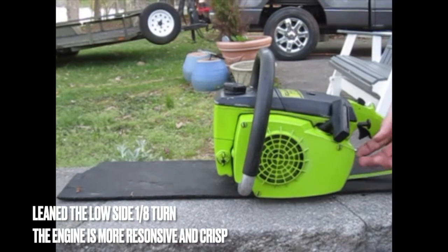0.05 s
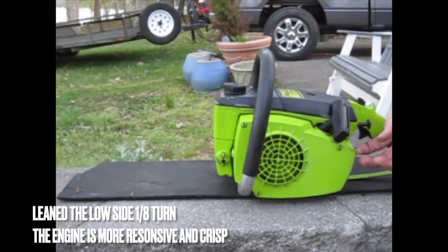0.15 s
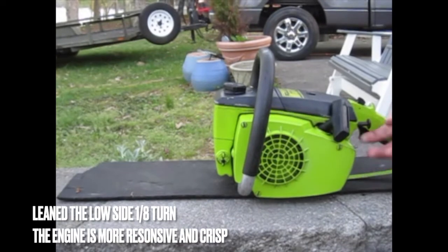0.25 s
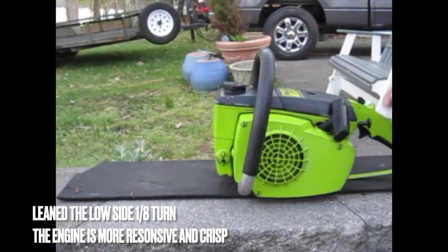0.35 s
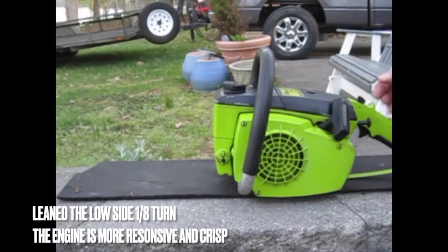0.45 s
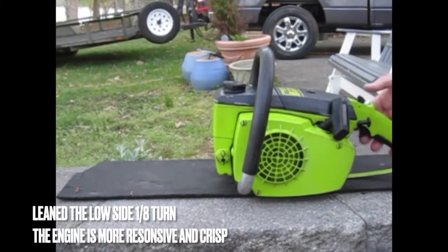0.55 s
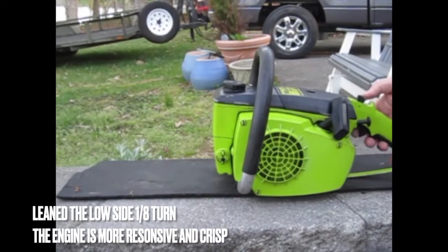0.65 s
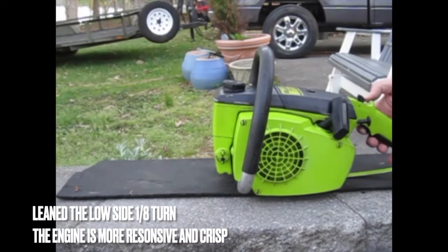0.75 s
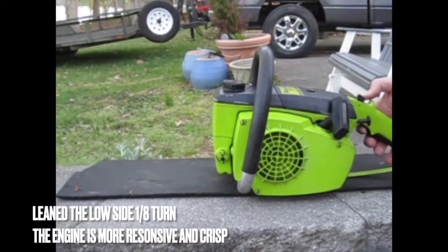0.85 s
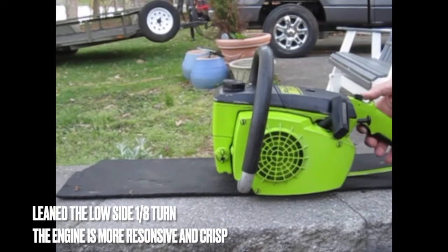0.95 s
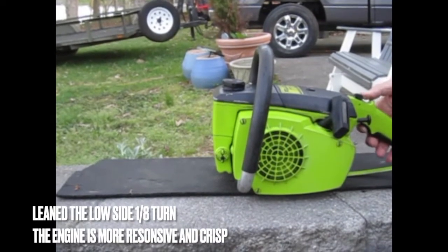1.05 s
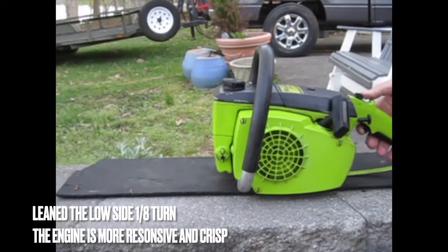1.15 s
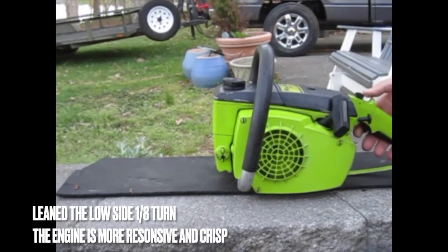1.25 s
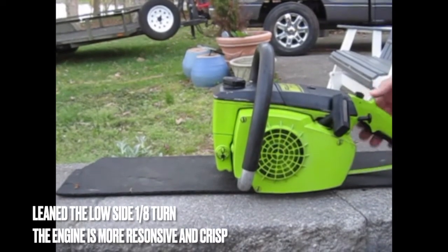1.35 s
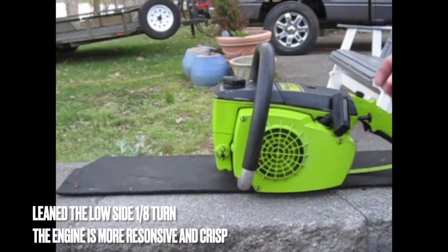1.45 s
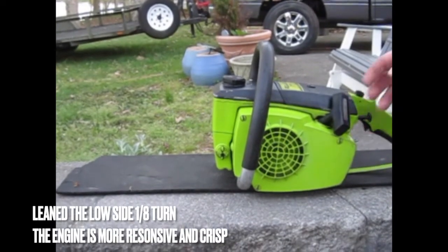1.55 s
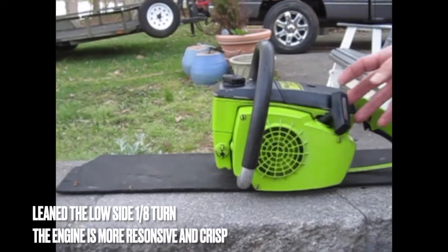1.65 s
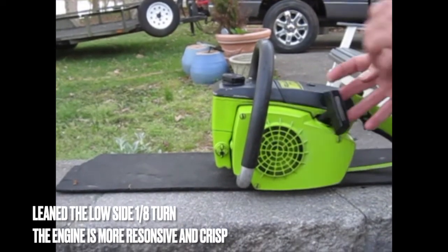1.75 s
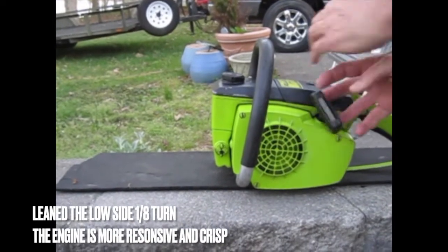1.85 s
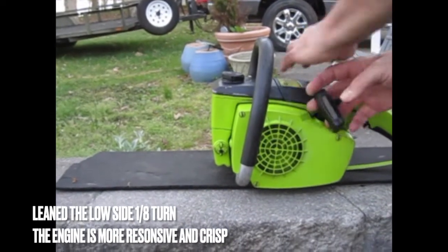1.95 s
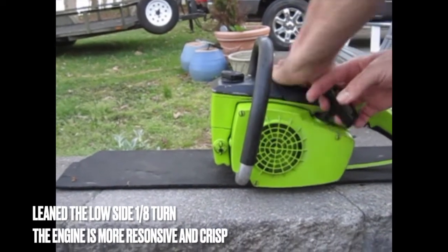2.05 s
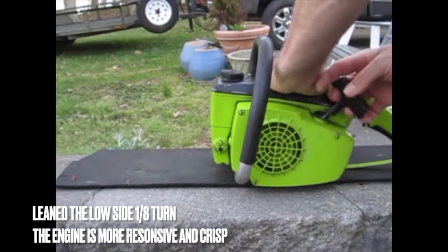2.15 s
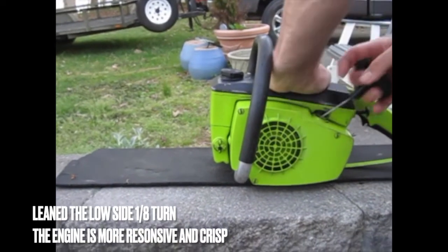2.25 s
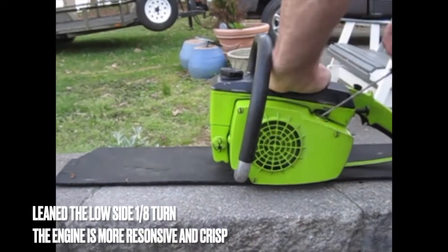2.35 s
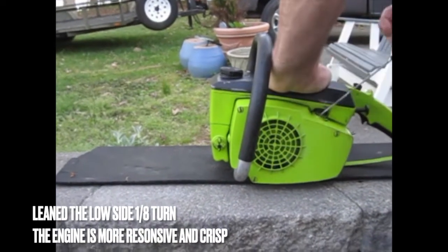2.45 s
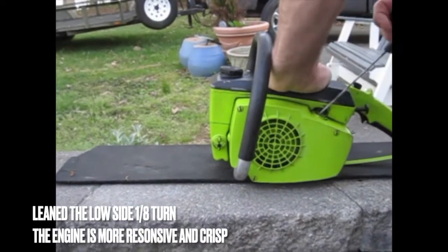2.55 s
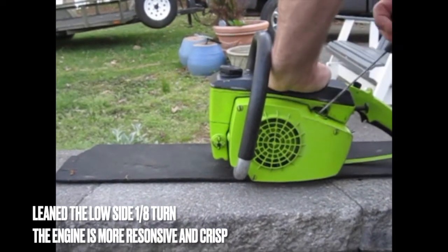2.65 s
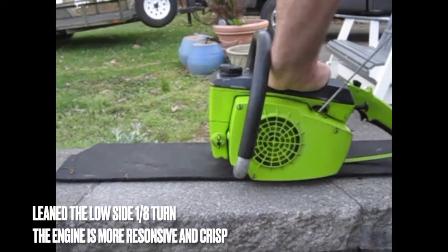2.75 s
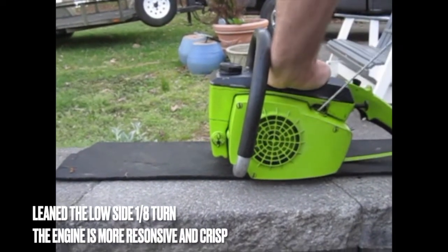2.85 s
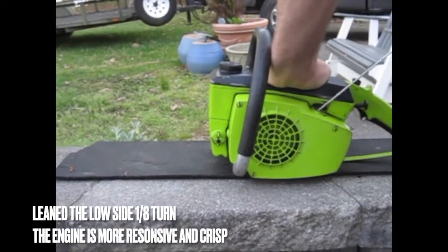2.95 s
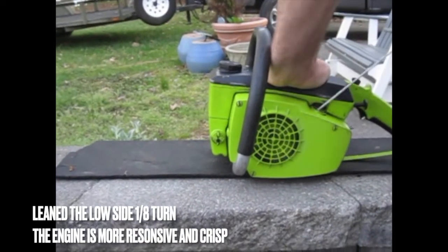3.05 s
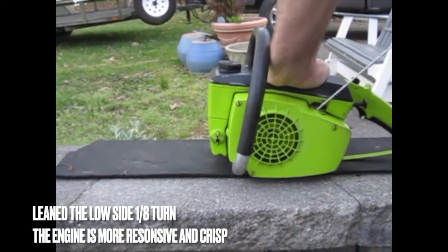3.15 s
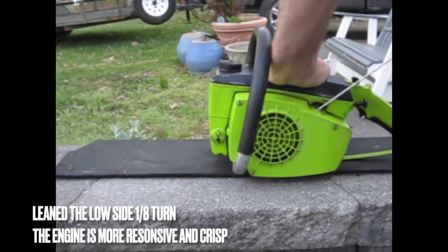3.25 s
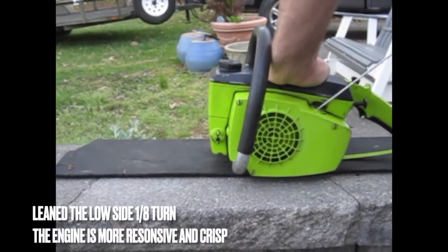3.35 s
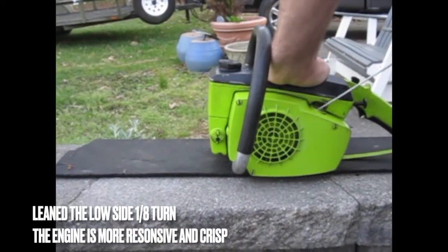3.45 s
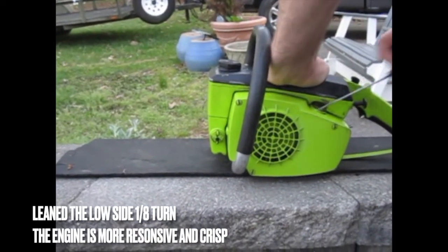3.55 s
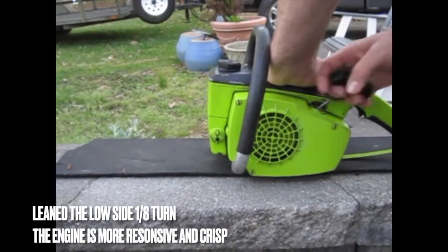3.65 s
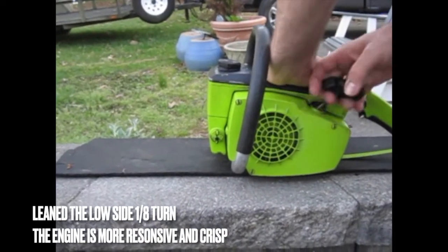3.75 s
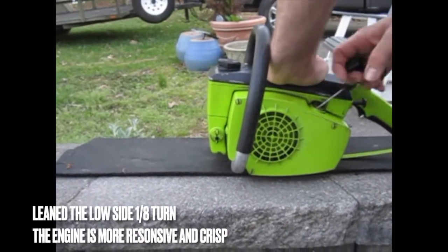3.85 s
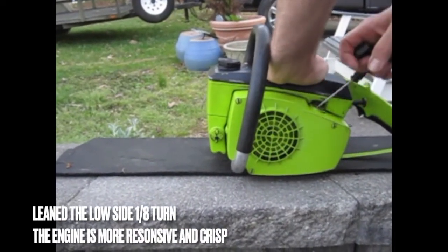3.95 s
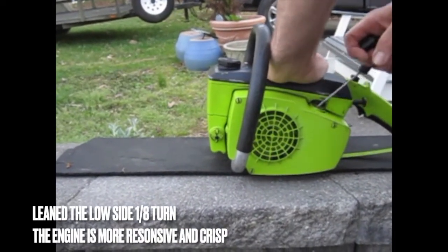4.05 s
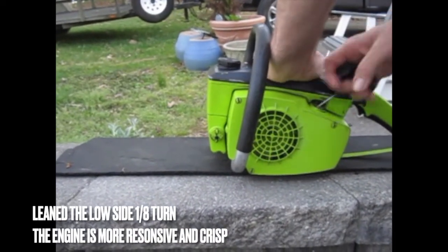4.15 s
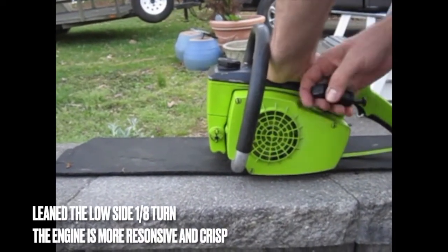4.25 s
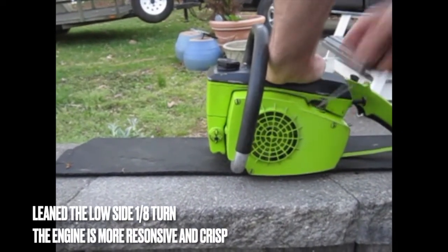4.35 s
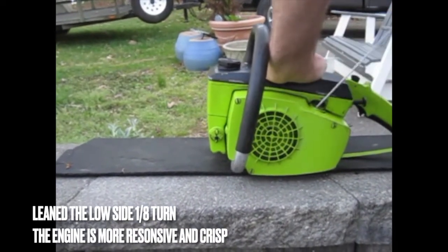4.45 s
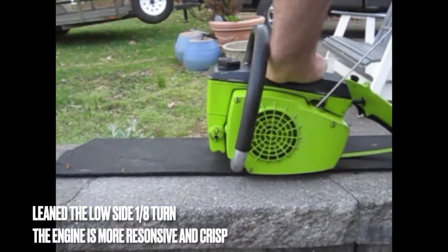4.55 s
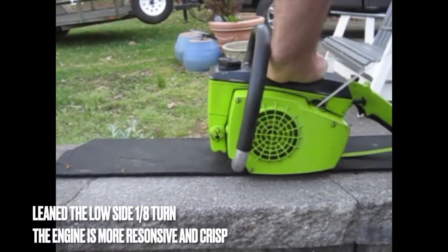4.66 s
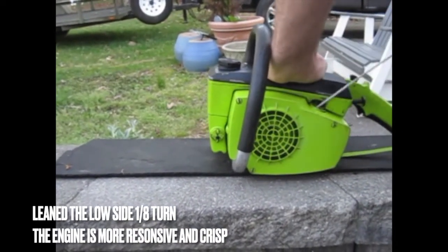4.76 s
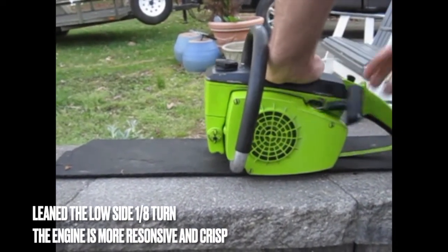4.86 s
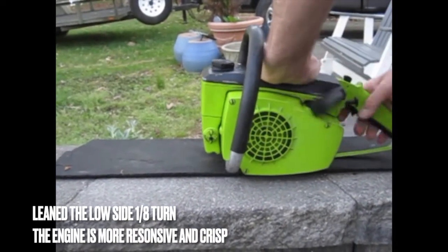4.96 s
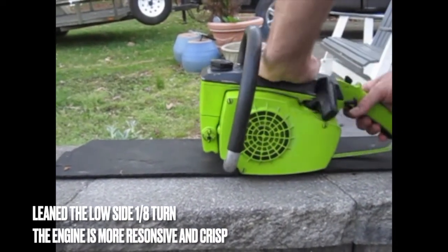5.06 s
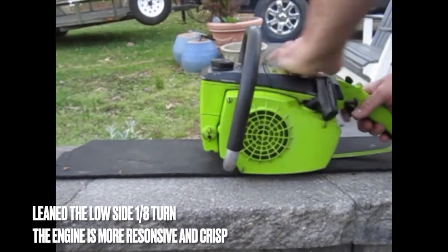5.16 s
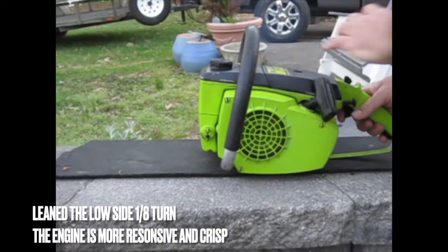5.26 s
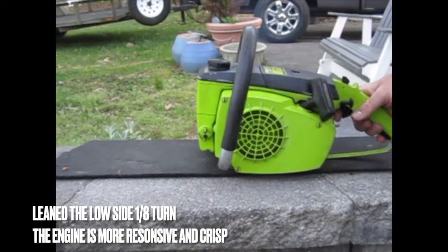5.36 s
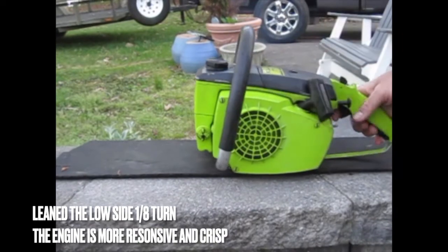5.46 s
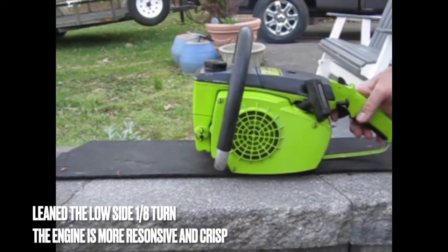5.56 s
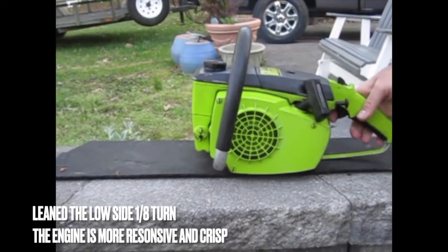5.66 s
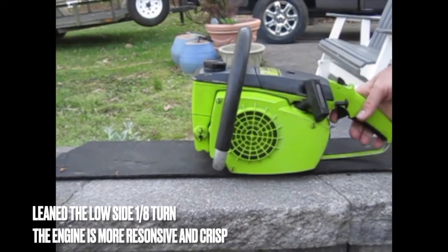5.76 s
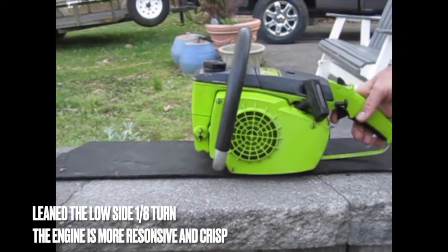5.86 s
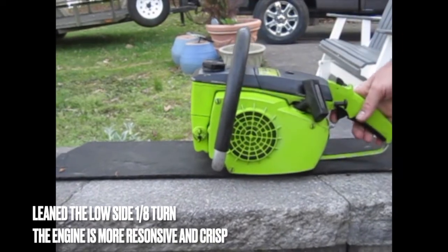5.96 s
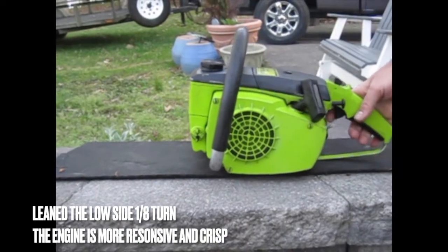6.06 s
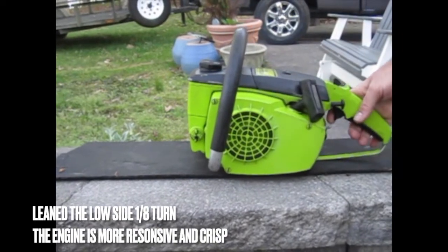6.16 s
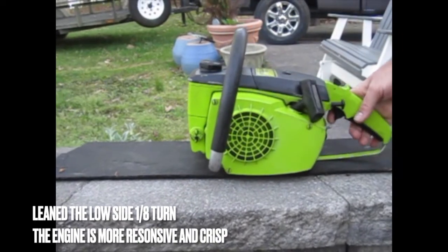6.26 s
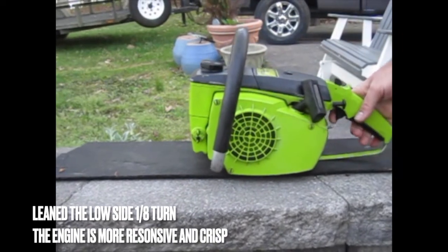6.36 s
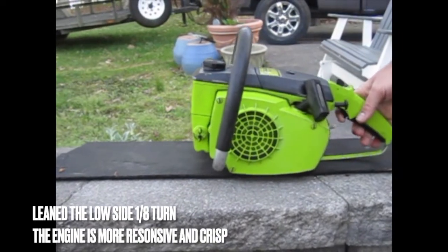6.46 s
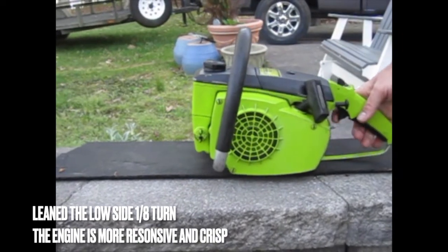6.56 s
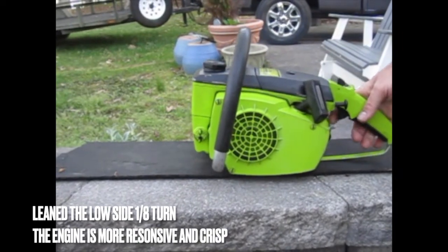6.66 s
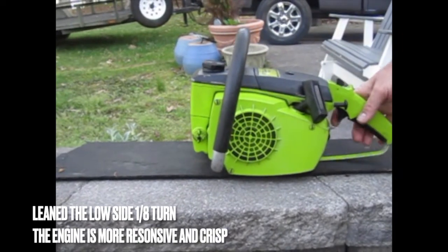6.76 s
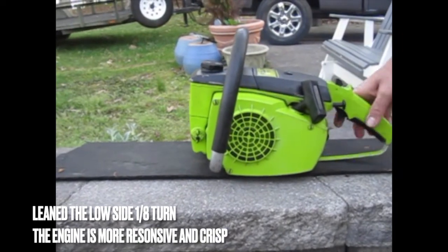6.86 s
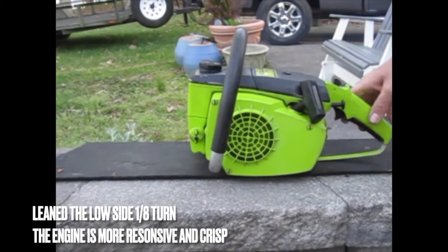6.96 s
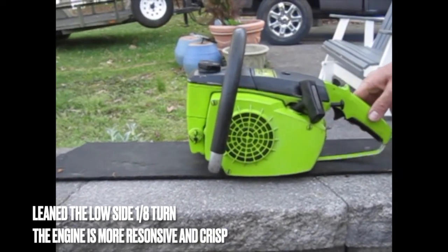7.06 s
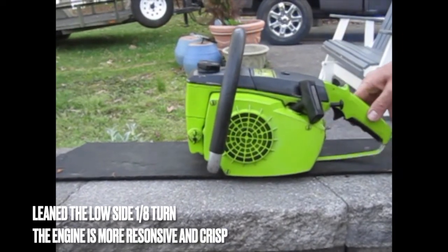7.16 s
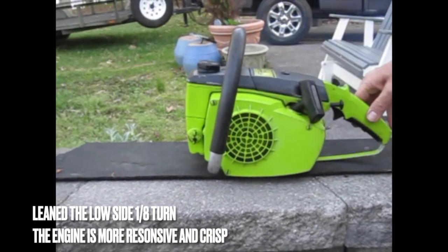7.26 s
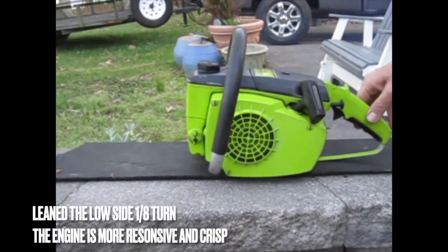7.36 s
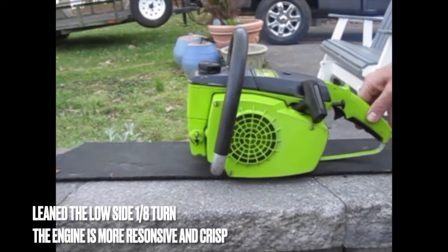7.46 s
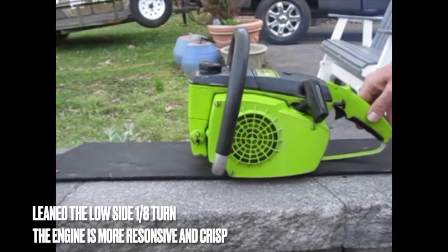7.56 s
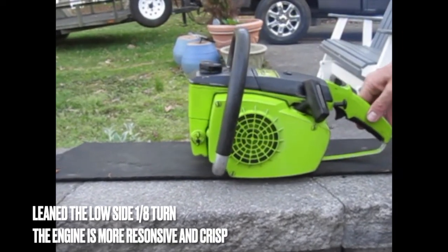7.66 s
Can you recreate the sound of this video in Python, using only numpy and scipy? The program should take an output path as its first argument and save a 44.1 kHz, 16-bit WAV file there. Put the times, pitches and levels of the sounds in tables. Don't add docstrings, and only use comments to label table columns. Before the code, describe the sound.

Close to a small two-stroke chainsaw on a stone ledge in a quiet yard. Switches and levers click, a palm thumps the plastic shell, then several cord pulls bring hard clacks, whirring flywheel and coughs. At 4.5 seconds the engine catches and climbs to a raspy high rev, coasts down, gets a brief second rev at 6.5 seconds, then slows with popping exhaust.

```python
import sys
import numpy as np
from scipy import signal
from scipy.fft import rfft, irfft, next_fast_len
from scipy.io import wavfile
from scipy.ndimage import uniform_filter1d

SR = 44100
rng = np.random.default_rng(int(sys.argv[2]) if len(sys.argv) > 2 else 0)


def makeup_ratio(level_db):
    decades = np.asarray(level_db, float) / 20
    return 10 ** decades


def store_pcm(level_fs):
    pcm = np.round(np.clip(level_fs, -1, 1) * 32767).astype(np.int16)
    wavfile.write(sys.argv[1], SR, np.atleast_2d(pcm).T)


N = 340011
TIME_S = np.arange(N) / SR

# freq_hz, density_db
HUM_SPECTRUM = [(88, -47), (150, -37.5), (172, -11), (821, -2.5), (1080, -3.5), (1170, 0), (1830, -11),
                (2020, -17), (2180, -10), (2310, -8.5), (16000, -34.5)]
# freq_hz, width_hz, level_db
HUM_PEAKS = [
    (1170, 160, -9.5),
    (1873, 41, -3.5),
    (2120, 77, -10.5),
]
HUM_DB = -49.5
# time_s, level_db
WIND = [(0, -57), (1.14, -57.5), (1.22, -47.5), (1.55, -57.5), (1.75, -50.5), (2.0, -49), (2.15, -56),
        (3.35, -56), (3.5, -66), (3.8, -58), (4.4, -55), (4.5, -73)]
# time_s, peak_db, pitch_hz
LOW_THUMPS = [(1.22, -32.5, 200), (1.351, -38.5, 76.6), (1.758, -45, 130), (1.853, -42, 120),
              (1.955, -31, 153), (2.806, -33.5, 136), (3.108, -27.5, 130), (3.361, -42, 161),
              (3.84, -41, 80), (4.389, -40, 100), (7.653, -30, 140)]
# start_s, length_s, from_hz, to_hz, level_db
CHIRPS = [
    (1.448, .016, 5700, 7500, -57),
    (.562, .04, 8000, 6000, -68),
]

# start_s, end_s, first_db, last_db
RUBS = [(2.23, 2.448, -43.5, -50.5), (2.84, 2.915, -37, -45), (3.135, 3.215, -40, -52),
        (2.7, 2.95, -52, -53), (2.98, 3.197, -48, -37), (3.306, 3.42, -46, -38), (3.622, 3.838, -48, -45),
        (4.084, 4.383, -45, -51), (4.393, 4.534, -39, -35.5)]
# freq_hz, density_db
RUB_SPECTRUM = [(500, -8), (1100, 9), (3000, -3.5), (6500, -10.5), (12000, -22), (16000, -42)]
# hardest_s, whirr_db
PULLS = [
    (2.35, -47.5),
    (2.8, -38),
    (3.18, -45),
    (4.42, -36.5),
]
PULL_RISE_S, PULL_FALL_DB_PER_S = 0.098, 68
# freq_hz, density_db
WHIRR_SPECTRUM = [(150, -35), (200, -9), (800, 0), (1200, 0), (2300, -9), (16000, -35)]
# start_s, end_s, level_db, fall_db_per_s
SPRING = [(2.07, 2.174, -43, 25), (3.401, 3.573, -40.5, 24), (3.575, 3.83, -41, 50), (3.84, 3.94, -56, 28)]
SPRING_HZ = 6627

# time_s, peak_db, knock_hz, rattle_t60_s, treble_db
THUDS = [(0.339, -26.5, 940, .05, -5), (1.703, -9.5, 945, 0.035, -17), (2.246, -24, 1070, .05, -6),
         (2.295, -7, 797, 0.046, 1.8), (2.321, -12.5, 520, 0.068, -15), (2.365, -22, 1300, .04, -10),
         (2.37, -20, 880, .05, -10), (2.386, -25, 1410, .03, -8), (2.502, -18.5, 930, 0.013, 2),
         (2.503, -16, 3700, 0.0088, -6), (2.764, -17.5, 597, 0.037, -12), (2.774, 6, 1560, 0.023, -6),
         (2.836, -12, 2000, 0.04, -3), (2.837, -13, 640, 0.067, -1), (2.884, -14, 1350, .065, -10),
         (3.008, -20, 700, .04, -10), (3.018, 3.5, 1450, 0.03, -3), (3.136, -5.5, 2050, 0.031, 1.5),
         (3.137, -10, 723, .06, -5), (3.156, -13, 1300, 0.07, -8), (3.198, -17, 1200, .036, -6),
         (3.84, -9.5, 865, 0.043, -10), (3.991, -26, 1500, .02, -10), (4.002, -12, 1053, 0.04, -4),
         (4.004, -12, 1490, .04, -5.5), (4.009, -9, 1100, .05, -6), (4.012, -26, 2550, .12, -20),
         (4.13, -30, 3200, .1, -8), (4.162, -29, 3200, .05, -8), (4.372, -26, 3150, .1, -15),
         (4.42, -30, 3150, .08, -15), (4.455, -19, 1300, 0.04, -1), (4.461, -7, 1190, 0.022, -6)]
THUD_CRACK_DB = -33
# time_s, peak_db, knock_hz, crack_re_peak_db
SNAPS = [(0.101, -27, 1310, -16), (0.166, -13, 2620, 2), (0.19, -35, 1150, 1), (0.31, -17.5, 1320, -16),
         (0.942, -33.5, 1110, -10), (2.077, -6.5, 940, -10), (2.188, -15.5, 1340, -5),
         (3.331, -14, 1430, -3), (3.355, -14, 1074, -11), (3.689, -20, 1055, 0), (3.734, -26.5, 1430, -11),
         (3.839, -2.5, 1450, -7), (4.119, -24, 1400, -8), (4.124, -22, 900, -20), (4.164, -35, 931, 1.5),
         (4.254, -28, 1400, -14), (4.263, -28, 1090, -20), (4.358, -23, 1280, -17),
         (4.387, -1.5, 1350, -0.5), (4.476, -20, 1210, 2.5)]
SNAP_T60_S, SNAP_T60_S_PER_DB, SNAP_RING_DB, SNAP_RING_PER_DB = .035, -.001, -46, 0.1
# time_s, peak_db
RATCHET = [(3.405, -18), (3.459, -19.5), (3.513, -19), (3.576, -17), (3.675, -18)]
TOOTH_HZ, TOOTH_T60_S, TOOTH_CRACK_DB, TOOTH_RING_DB = 1166, 0.069, 9.5, -36.5
# time_s, peak_db
SLACK = [(2.059, -22.5), (2.288, -27), (4.377, -24), (2.762, -19), (3.006, -23), (3.324, -20.5),
         (3.395, -31), (3.664, -21), (3.826, -20)]
SLACK_HZ, SLACK_T60_S, SLACK_CRACK_DB = 1300, 0.097, -13.5
# freq_hz, level_db, t60_s
SHELL_MODES = [(963, -24, 0.12), (1007, 2.5, 0.051), (1430, 2, 0.037), (1500, -28, 0.11), (2090, 1, 0.022),
               (2548, -5.5, 0.07), (3330, -38, 0.09), (3900, -47, .03)]
# freq_hz, level_db, t60_s
PAWL_MODES = [(5593, -9, 0.12), (6185, 0, 0.14), (8716, -10, 0.07), (6912, -14, 0.093), (7682, -8, 0.15),
              (9211, -14, 0.16), (10190, -13, 0.08), (11540, -15, 0.094), (12600, -10, 0.055),
              (13550, -14, 0.081), (13890, -8, 0.12), (14120, -5, 0.061), (14320, -12, 0.078)]
# freq_hz, width_hz, level_db
CRACK_PEAKS = [(6260, 290, -3.5), (7500, 540, -3), (8680, 145, -3.5), (10300, 140, -3), (11300, 690, -13.5),
               (12670, 250, -5.5), (14200, 270, -15)]

# time_s, turns_per_s
CRANK_SPEED = [(4.54, 61), (4.62, 69), (4.66, 79.19), (4.8, 105.03), (4.95, 120.81), (5.2, 139.97),
               (5.4, 115.89), (5.65, 91.97), (5.9, 78.61), (6.1, 67.47), (6.3, 56.88), (6.45, 53.29),
               (6.595, 105.24), (6.8, 88.65), (7.1, 71.29), (7.4, 57.28), (7.75, 44.21)]
FIRST_TURN_S, CRUISE_HZ = 4.5518, 100
# start_s, end_s, fires_every_turns, first_bang_db, last_bang_db
THROTTLE = [
    (4.54, 4.645, 1, -8, -11),
    (4.65, 5.04, 2, -6.5, -13),
    (5.048, 5.199, 2, -10.5, -12),
    (6.46, 6.599, 1, -7, -10.5),
]

# freq_hz, density_db
AIR_SPECTRUM = [(1710, -15), (2900, 6), (3520, -4), (3860, -6.5), (4610, -11), (6640, -7), (7770, -9.5),
                (9980, -13), (15400, -26), (16300, -60)]
# freq_hz, width_hz, level_db
CASING_PEAKS = [(5130, 110, 7), (5900, 19, 17), (6650, 540, 8.5), (8700, 130, 7), (10300, 120, 4),
                (11500, 300, 2.5), (12600, 150, -2), (14050, 230, -4), (15580, 60, -3)]
HISS_DB, HISS_DB_PER_OCTAVE, HISS_OPEN_DB = -33.5, 9.5, -3
GULP_S, GULP_WIDTH_S, GULP_DB = 6.5, 0.04, 6
THROB_DB, THROB_OPEN_DB = -60.5, -48

# freq_hz, width_hz, level_db
INTAKE_PEAKS = [(2150, 200, 0), (2640, 160, 1.5), (3220, 150, -9), (4100, 250, -15)]
INTAKE_DB, INTAKE_DB_PER_OCTAVE, INTAKE_OPEN_DB = -34, 3.5, -3.5
TUNED_HZ, TUNED_OCTAVES, TUNED_SHUT_DB, TUNED_OPEN_DB = 94, 0.22, 9, 8.5
SECOND_HZ, SECOND_OCTAVES, SECOND_DB = 66, .08, 3.5

# time_s, peak_db
BACKFIRES = [(5.2048, -22), (6.4287, -17.5), (6.4655, -12.5), (7.2865, -14), (7.571, -15.5), (7.652, -8.5)]
# time_s, peak_db
CLOSED_BANGS = [(5.853, -10), (5.866, -8), (5.981, -12), (6.357, -12), (6.923, -11), (6.974, -10),
                (7.554, -11), (6.023, -8), (6.08, -7), (6.125, -7), (6.187, -7), (6.235, -7), (6.285, -7),
                (6.303, -6), (6.321, -5), (6.376, -5), (6.394, -6), (6.432, -6), (7.08, -6), (7.136, -7),
                (7.195, -8), (7.211, -8), (7.288, -5), (7.387, -6), (7.422, -6), (7.458, -6), (7.495, -8),
                (7.514, -6), (7.572, -5), (7.654, -5)]
# time_s, peak_db
COUGHS = [(2.336, -6), (2.807, 4.5), (2.858, -6.5), (2.885, -5.5), (3.108, 7.5), (3.154, -5), (3.18, -3),
          (4.419, -1), (4.438, -8), (4.4605, 6.5), (4.4635, 4), (4.491, 6), (4.514, 8), (4.533, 6.5)]
# freq_hz, level_db, t60_s
BANG_MODES = [(308, -20.5, 0.025), (552.6, -7, 0.022), (664, -10, 0.026), (860, -7.5, 0.016),
              (1328, -14.5, 0.021), (1560, -19.5, 0.035)]
# freq_hz, level_db, t60_s
BLAST_MODES = [(1480, -14.5, 0.011), (2060, -15.5, 0.0075), (3060, -15, .008)]
BLAST_EARLY_S = 0.001097
# freq_hz, level_db, t60_s
PUFF_MODES = [(317, -15, 0.027), (600, -13.5, 0.022), (704, -7, 0.024), (907, -7.5, 0.01),
              (1210, -7, 0.017), (1490, 0.5, 0.012)]
# freq_hz, level_db, t60_s
SUCK_MODES = [(315, -9, 0.024), (566, -2.1, 0.014), (682, -4.5, 0.031), (815, -21, 0.022),
              (1075, -10.5, 0.065)]
# freq_hz, width_hz, level_db
EDDY_PEAKS = [(1100, 270, 1.5), (1450, 290, 4.5), (2160, 260, -5)]
PORT_OPEN_TURNS = .352
UNFIRED_LATE_S = .00066
PUFF_DB, PUFF_DB_PER_OCTAVE, PUFF_OPEN_DB = -13, -1.2, 0.3
EDGE_DB_PER_OCTAVE, LOW_DB_PER_OCTAVE = 3.5, 8.0
SHUT_SHARE, SHUT_OPEN_SHARE, SHUT_FIRED_SHARE, HALF_FIRED_SUCK = 0.42, 0.17, 0.44, 0.58
SHUT_DB_PER_OCTAVE, SHUT_EARLY_S = -11.0, 0.00069
SPUTTER_BELOW_HZ, SPUTTER_SHARE, SPUTTER_DB, BANG_SPREAD_DB = 60, .04, -14.0, .7
WEAK_DB, WEAK_FROM_S, WEAK_OVER_S, WEAK_LATE_S = -20, 0.011, 0.0027, 0.00093
LEDGE_DIP_HZ = 1780


def rms_one(x):
    return x / np.sqrt(np.mean(x ** 2) + 1e-20)


def in_time(rows):
    s, *columns = np.transpose(rows)
    return [np.interp(TIME_S, s, c) for c in columns]


def bump(x, centre, width):
    return np.exp(-.5 * ((x - centre) / width) ** 2)


def clicks(s, size):
    out = np.full(N, 1e-18)
    at = np.clip(np.round(np.asarray(s) * SR).astype(int), 0, N - 1)
    np.add.at(out, at, size)
    return out


def decaying(x, t60_s):
    return signal.lfilter([1], [1, -makeup_ratio(-60 / (t60_s * SR))], x)


def cut(x, hz, kind, order=2):
    return signal.sosfilt(signal.butter(order, hz, kind, fs=SR, output="sos"), x)


def ring(x, modes):
    out = 0
    for hz, db, t60_s in modes:
        r = makeup_ratio(-60 / (t60_s * SR))
        w = 2 * np.pi * hz / SR
        out = out + signal.lfilter([0, makeup_ratio(db) * np.sin(w)], [1, -2 * r * np.cos(w), r * r], x)
    return out


def resonate(x, peaks):
    out = 0
    for k, (hz, width_hz, db) in enumerate(peaks):
        r = np.exp(-np.pi * width_hz / SR)
        top = (-1) ** k * makeup_ratio(db) * (1 - r * r) / 2
        out = out + signal.lfilter([top, 0, -top], [1, -2 * r * np.cos(2 * np.pi * hz / SR), r * r], x)
    return out


def coloured(spectrum):
    hz, db = np.transpose(spectrum)
    size = next_fast_len(N)
    log_hz = np.log(np.arange(size // 2 + 1) * SR / size + 1)
    shape = makeup_ratio(np.interp(log_hz, np.log(hz), db))
    return rms_one(irfft(rfft(rng.standard_normal(size)) * shape, size)[:N])


def yard():
    wind_db, = in_time(WIND)
    hum = coloured(HUM_SPECTRUM) + makeup_ratio(22) * resonate(rng.standard_normal(N), HUM_PEAKS)
    lumps = makeup_ratio(5.1 * rms_one(cut(rng.standard_normal(N), 14, "low")))
    wind = rms_one(lumps * cut(rng.standard_normal(N), [45, 200], "band"))
    thumps = 0
    for s, db, hz in LOW_THUMPS:
        thumps = thumps + ring(cut(clicks([s], makeup_ratio(db)), 380, "low"), [(hz, 0, .12), (1.7 * hz, -5, .05)])
    return makeup_ratio(HUM_DB) * hum + makeup_ratio(wind_db) * wind + thumps


def bird():
    out = np.zeros(N)
    for s, length_s, from_hz, to_hz, db in CHIRPS:
        u = np.arange(round(length_s * SR)) / (length_s * SR)
        hz = to_hz + (from_hz - to_hz) * (1 - u) ** 2
        tone = makeup_ratio(db) * np.sin(np.pi * u) * np.sin(2 * np.pi * np.cumsum(hz) / SR)
        tail = makeup_ratio(-29 - 150 * np.arange(4000) / SR) * rng.standard_normal(4000)
        at = round(s * SR)
        out[at:at + len(u)] += tone
        out[at + 200:at + 4199 + len(u)] += np.convolve(tone, tail)
    return out


def rubbing():
    level = 0
    for start, end, first_db, last_db in RUBS:
        inside = (TIME_S > start) & (TIME_S < end)
        level = level + makeup_ratio(np.interp(TIME_S, [start, end], [first_db, last_db])) * inside
    grain = makeup_ratio(3.0 * rms_one(cut(rng.standard_normal(N), 120, "low")))
    return uniform_filter1d(level, size=900) * rms_one(grain * coloured(RUB_SPECTRUM))


def flywheel():
    level = 0
    for s, db in PULLS:
        fall_db = PULL_FALL_DB_PER_S * np.maximum(TIME_S - s, 0)
        level = level + makeup_ratio(db - fall_db) * np.clip(1 + (TIME_S - s) / PULL_RISE_S, 0, 1)
    return level * coloured(WHIRR_SPECTRUM)


def spring():
    level = 0
    for start, end, db, fall in SPRING:
        level = level + makeup_ratio(db - fall * (TIME_S - start)) * (TIME_S > start) * (TIME_S < end)
    return uniform_filter1d(level, size=90) * np.sin(2 * np.pi * SPRING_HZ * TIME_S)


def contacts():
    rows = [(s, db, hz, THUD_CRACK_DB, t60_s, TOOTH_RING_DB, treble_db)
            for s, db, hz, t60_s, treble_db in THUDS]
    for s, db, hz, crack_db in SNAPS:
        t60_s = SNAP_T60_S + SNAP_T60_S_PER_DB * db
        rows.append((s, db, hz, crack_db, t60_s, SNAP_RING_DB + SNAP_RING_PER_DB * db, 0))
    rows += [(s, db, TOOTH_HZ, TOOTH_CRACK_DB, TOOTH_T60_S, TOOTH_RING_DB, 0) for s, db in RATCHET]
    rows += [(s, db, SLACK_HZ, SLACK_CRACK_DB, SLACK_T60_S, TOOTH_RING_DB, 0) for s, db in SLACK]
    return rows


def knocks():
    out, t = np.zeros(N), np.arange(8800) / SR
    click = t == 0
    for s, db, hz, crack_db, t60_s, ring_db, treble_db in contacts():
        noise = rng.standard_normal((2, len(t)))
        t60_s = np.clip(t60_s, .005, .3)
        rattle = makeup_ratio(db - 60 * t / t60_s) * noise[0] * np.minimum(t / 0.0011, 1)
        snap_level = makeup_ratio(-60 * t / (0.29 * t60_s)) + 0.21 * makeup_ratio(-60 * t / t60_s)
        snap = makeup_ratio(db + crack_db) * noise[1] * snap_level
        body = makeup_ratio(2.0) * resonate(rattle, [(hz, 250, 0), (1.85 * hz, 1500, -5)])
        body = body + makeup_ratio(-41) * ring(rattle, SHELL_MODES)
        body = body + ring(makeup_ratio(db - 10.0) * cut(click, 3.0 * hz, "low"), [(hz, 0, 1.05 * t60_s)])
        dull = resonate(body, [(hz, 0.64 * hz, 0)])
        body = dull + makeup_ratio(treble_db) * (body - dull)
        crack = makeup_ratio(5.0) * (resonate(snap, CRACK_PEAKS) + 0.3 * cut(snap, [2500, 14000], "band"))
        uneven = [(f, level + 4.0 * luck, min(decay, .2))
                  for (f, level, decay), luck in zip(PAWL_MODES, noise[0, -20:])]
        steel = ring(makeup_ratio(db + crack_db + ring_db + 17) * click, uneven)
        at = round(s * SR)
        out[at:at + len(t)] += cut(body, [200, 4200], "band") + crack + steel
    return out


def crank():
    speed, = in_time(CRANK_SPEED)
    angle = np.cumsum(speed) / SR
    angle -= np.interp(FIRST_TURN_S, TIME_S, angle)
    times = np.interp(np.arange(int(angle[-1]) + 1), angle, TIME_S)
    first_rev = TIME_S < THROTTLE[2][1]
    second_rev = (TIME_S > THROTTLE[3][0]) & (TIME_S < THROTTLE[3][1])
    opened = uniform_filter1d(1. * (first_rev | second_rev), size=1500)
    return times, angle, np.log2(speed / CRUISE_HZ), opened


def fan(angle, octaves, opened):
    hiss_db = HISS_DB + HISS_DB_PER_OCTAVE * octaves + HISS_OPEN_DB * opened
    hiss_db = hiss_db + GULP_DB * bump(TIME_S, GULP_S, GULP_WIDTH_S)
    air = coloured(AIR_SPECTRUM)
    rattle = rms_one(resonate(rng.standard_normal(N), CASING_PEAKS))
    touches = np.interp(angle % 1, np.linspace(0, 1, num=160), rng.standard_normal(160))
    rattle = rattle + makeup_ratio(-1.5) * rms_one(cut(touches, [3000, 4600], "band"))
    pulse = 1 + 0.3 * np.cos(2 * np.pi * (angle - .1))
    fade_in = np.clip((TIME_S - 4.44) / 0.079, 0, 1)
    return makeup_ratio(hiss_db) * pulse * fade_in * (air + makeup_ratio(-10.0) * rattle)


def throb(times, angle, opened):
    running = np.clip((TIME_S - times[0]) / .05, 0, 1)
    return makeup_ratio(THROB_DB + (THROB_OPEN_DB - THROB_DB) * opened) * running * np.sin(2 * np.pi * angle)


def intake(times, angle, octaves, opened):
    tuned_db = TUNED_SHUT_DB + (TUNED_OPEN_DB - TUNED_SHUT_DB) * opened
    ring_db = INTAKE_DB + INTAKE_OPEN_DB * opened + INTAKE_DB_PER_OCTAVE * octaves
    ring_db = ring_db + tuned_db * bump(octaves, np.log2(TUNED_HZ / CRUISE_HZ), TUNED_OCTAVES)
    second = bump(octaves, np.log2(SECOND_HZ / CRUISE_HZ), SECOND_OCTAVES)
    ring_db = ring_db + SECOND_DB * (1 - opened) * second
    depth = np.clip(.09 * (np.gradient(angle) * SR - 60) / 5, .15, .8)
    gust = np.exp(depth * (np.cos(2 * np.pi * (angle - .68)) - 1)) * rng.standard_normal(N)
    period = np.gradient(times)
    gulp_s = times + .5 * period
    size = 32.0 / (period[:, None] * CRUISE_HZ) ** 2 * makeup_ratio(1.2 * rng.standard_normal((len(times), 2)))
    snap = sum(clicks(gulp_s + .0019 * k, size[:, k] * .7 ** k) for k in range(2))
    box = resonate(resonate(snap + gust, INTAKE_PEAKS), [(2160, 4800, 0)])
    running = np.clip((TIME_S - times[0] + 0.035) / 0.1, 0, 1)
    level = np.sqrt(uniform_filter1d(box ** 2, size=6001) + 1e-12)
    return makeup_ratio(ring_db) * box / level * running


def backfires():
    s, db = np.transpose(BACKFIRES)
    hit = clicks(s, makeup_ratio(db + 12))
    burst = 3.9 * hit + 0.43 * decaying(hit, 0.0063) * rng.standard_normal(N)
    return resonate(burst, [(1350, 300, 12), (2100, 450, 5.5), (4200, 2000, -19.5)])


def firings(times):
    luck = rng.random(len(times))
    spread = makeup_ratio(BANG_SPREAD_DB * rng.standard_normal(len(times)))
    sputter = (1 / np.gradient(times) < SPUTTER_BELOW_HZ) & (luck < SPUTTER_SHARE)
    when = times - .0003 + .00004 * rng.standard_normal(len(times))
    height = makeup_ratio(SPUTTER_DB) * sputter
    for start, end, every, first_db, last_db in THROTTLE:
        inside = np.flatnonzero((times > start) & (times < end))
        height[inside] = 0
        fired = inside[::round(every)]
        height[fired] = makeup_ratio(np.linspace(first_db, last_db, len(fired)))
    height *= spread
    for s, db in CLOSED_BANGS:
        turn = np.argmin(abs(times - s))
        when[turn], height[turn] = s - .0006, makeup_ratio(db)
    return when, height


def exhaust(times, octaves, opened):
    chance = rng.standard_normal((len(times), 4))
    period, at = np.gradient(times), (times * SR).astype(int)
    turn_octaves = -np.log2(period * CRUISE_HZ)
    load, is_open = opened[at], opened[at] > .5
    when, bang = firings(times)
    unsteady = np.clip((period - .0105) / .008, .25, 1)

    puff_db = (PUFF_DB + PUFF_DB_PER_OCTAVE * octaves + PUFF_OPEN_DB * opened)[at]
    puff = makeup_ratio(puff_db + 1.5 * unsteady * chance[:, 0]) * np.where(is_open, 1, -1)
    spent = np.where(bang > 0, .15, 1)
    opens = times - .0014 + UNFIRED_LATE_S * load + .0001 * unsteady * chance[:, 1]
    puffs = clicks(opens, puff * spent)
    edges = clicks(opens, puff * spent * makeup_ratio(EDGE_DB_PER_OCTAVE * turn_octaves))
    lows = clicks(opens, puff * spent * makeup_ratio(-LOW_DB_PER_OCTAVE * turn_octaves - 3))

    shuts = opens + PORT_OPEN_TURNS * period - SHUT_EARLY_S + .0001 * unsteady * chance[:, 2]
    coasting = np.minimum(SHUT_SHARE * makeup_ratio(SHUT_DB_PER_OCTAVE * turn_octaves), 0.95)
    share = np.where(is_open, SHUT_OPEN_SHARE, coasting)
    left = np.where(is_open, spent, np.where(bang > 0, HALF_FIRED_SUCK, 1))
    sucks = clicks(shuts, share * abs(puff) * left * makeup_ratio(1.5 * unsteady * chance[:, 3]))

    bang_s = when - .002
    bangs = clicks(bang_s, bang)
    bangs = bangs - clicks(bang_s + PORT_OPEN_TURNS * period, SHUT_FIRED_SHARE * unsteady * bang * load)
    weak = makeup_ratio(WEAK_DB + 3.5 * rng.standard_normal(len(times)))
    weak = weak * np.clip((period - WEAK_FROM_S) / WEAK_OVER_S, 0, 1)
    bangs = bangs + clicks(bang_s + WEAK_LATE_S, weak * (bang == 0) * (load < .5))
    cough_s, cough_db = np.transpose(COUGHS)
    coughs = clicks(cough_s - .0007, makeup_ratio(cough_db - 10.0)) + clicks(cough_s + 0.00626, 0.05 * makeup_ratio(cough_db))

    fired = ring(cut(bangs, 1840, "low") + cut(coughs, 730, "low"), BANG_MODES)
    late = ring(cut(sucks, 1270, "low"), SUCK_MODES) - fired * makeup_ratio(3.0)
    late = 2 * resonate(late, [(650, 1000, 0)]) - late
    gas = late + ring(cut(puffs, 1540, "low"), PUFF_MODES[1:4])
    gas = gas + ring(lows, PUFF_MODES[:1]) + ring(cut(edges, 1500, "low"), PUFF_MODES[4:])
    gas = .4 * gas + resonate(gas, [(650, 480, -1.5)])

    flow = decaying(.5 * abs(bangs) + .1 * coughs + abs(puffs) + sucks, .04)
    eddies = makeup_ratio(-6) * resonate(flow * rng.standard_normal(N), EDDY_PEAKS)
    shake = makeup_ratio(-0.5) * cut(bangs + 0.98 * coughs + 0.08 * puffs, [70, 210], "band")
    front = clicks(when - BLAST_EARLY_S, bang * unsteady) + clicks(cough_s - .0008, makeup_ratio(cough_db - 17.5))
    return cut(gas, 200, "high", order=4) + eddies + shake + ring(front, BLAST_MODES)


def scene():
    times, angle, octaves, opened = crank()
    engine = exhaust(times, octaves, opened) + backfires()
    engine = engine + intake(times, angle, octaves, opened) + fan(angle, octaves, opened)
    engine = engine - resonate(engine, [(LEDGE_DIP_HZ, 320, -3.5)]) + throb(times, angle, opened)
    saw = engine + knocks() + rubbing() + flywheel() + spring() + bird()
    echo = makeup_ratio(-23.5) * cut(np.roll(saw, round(.021 * SR)), 5700, "low")
    return (saw + echo + yard())[None]


def low_pass(x):
    return signal.sosfilt(signal.butter(12, 16800, fs=SR, output="sos"), x)


def record(dry):
    heard = cut(cut(dry, 15900, "low", order=8), 30, "high")
    limited = heard / (1 + (heard / .54) ** 4) ** .25
    limited = heard + cut(limited - heard, 120, "high")
    return low_pass(limited)


dry = scene()
out = record(dry)
store_pcm(out)
```